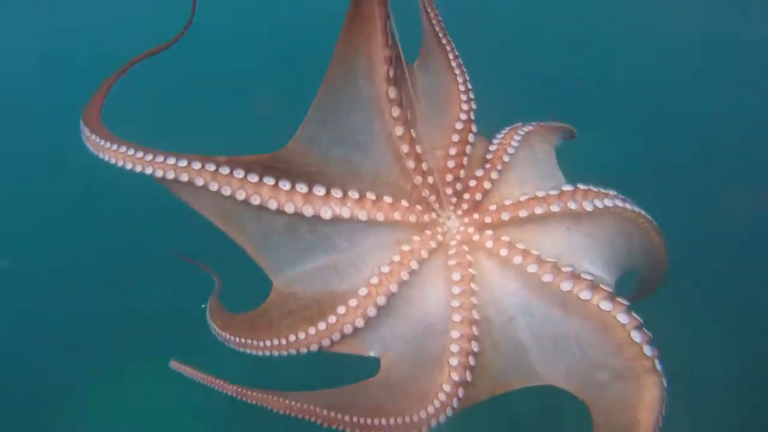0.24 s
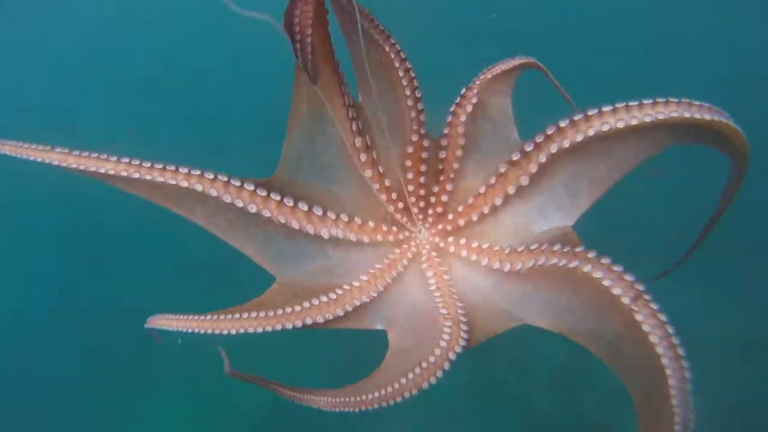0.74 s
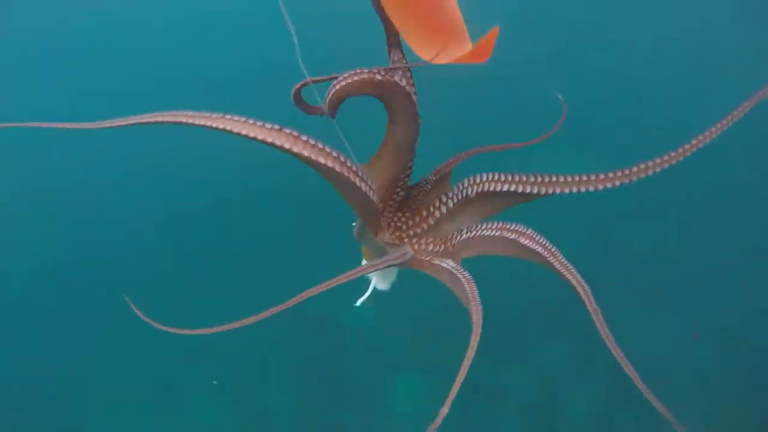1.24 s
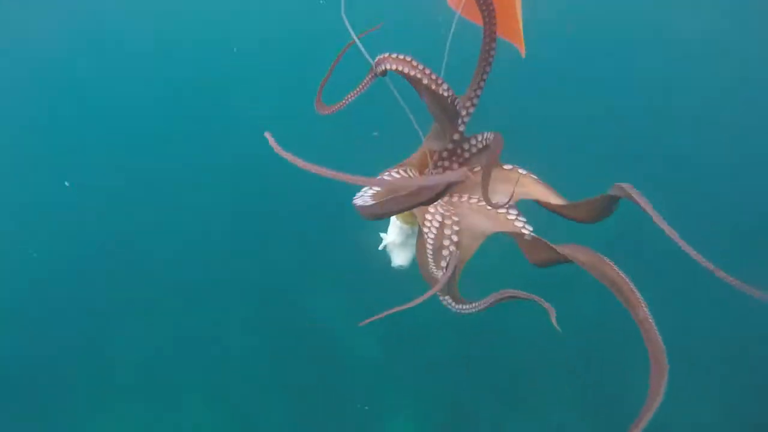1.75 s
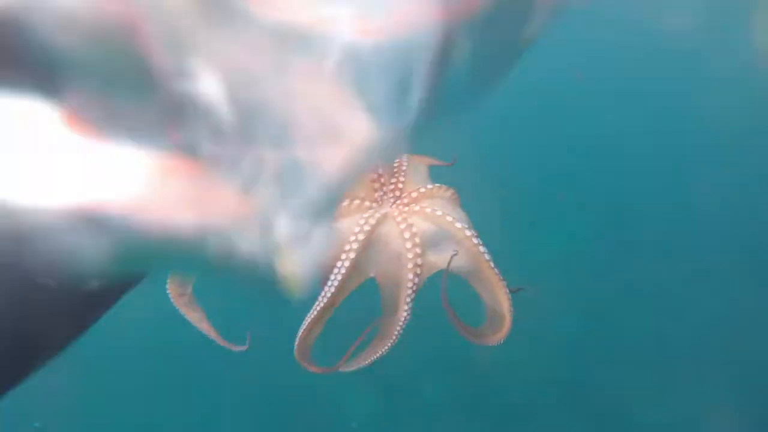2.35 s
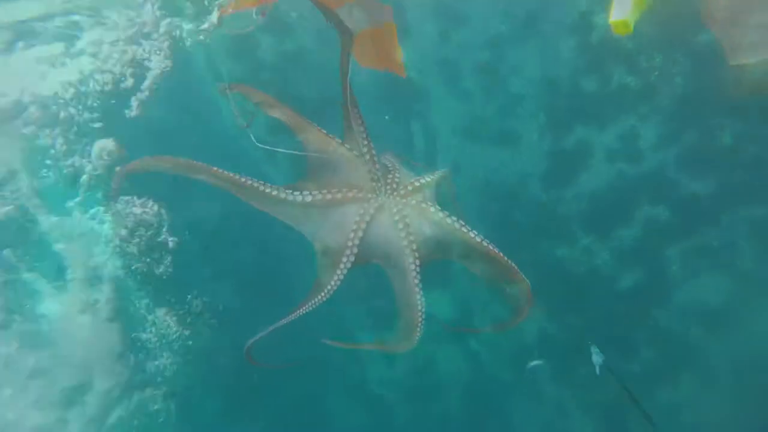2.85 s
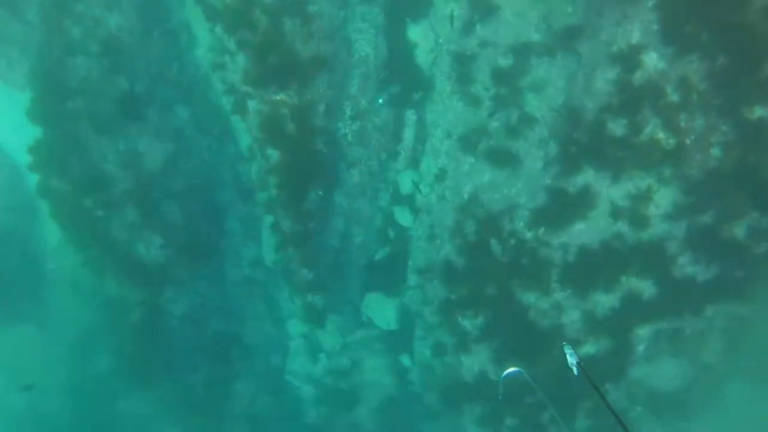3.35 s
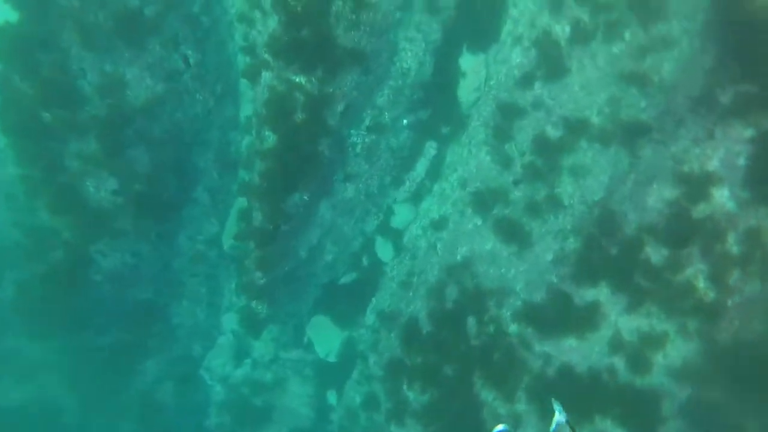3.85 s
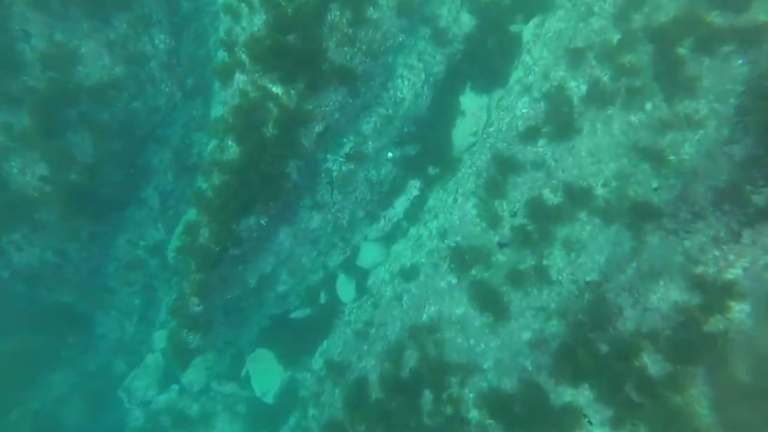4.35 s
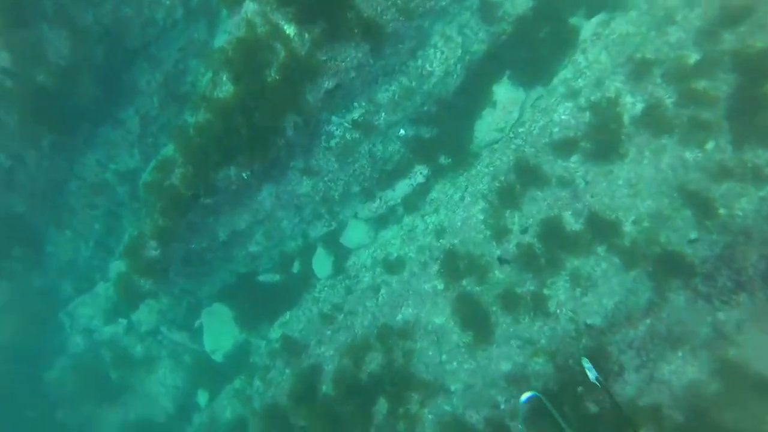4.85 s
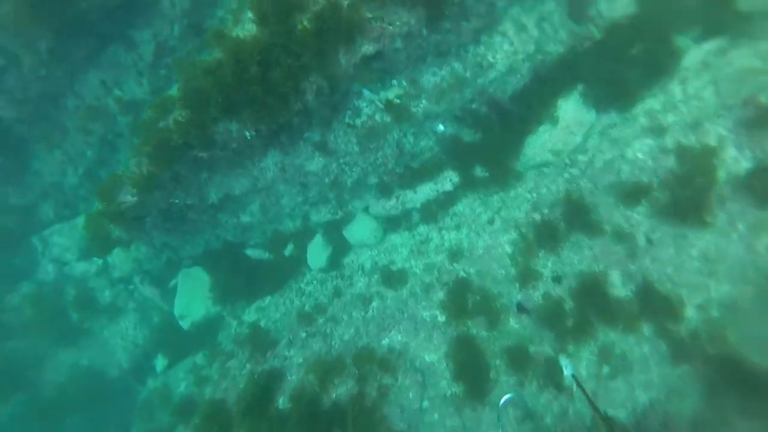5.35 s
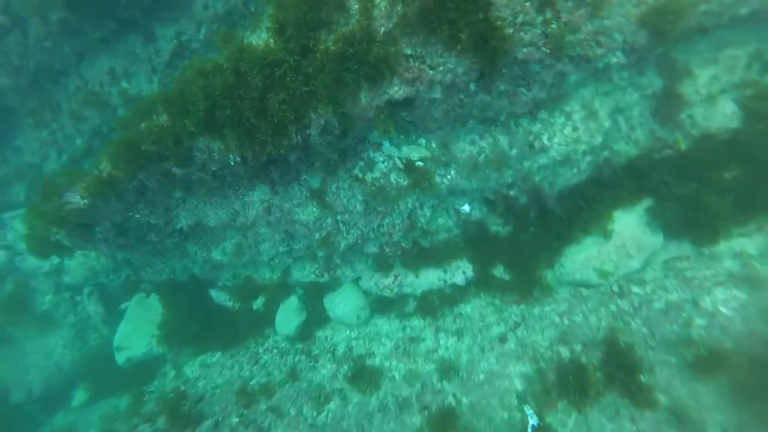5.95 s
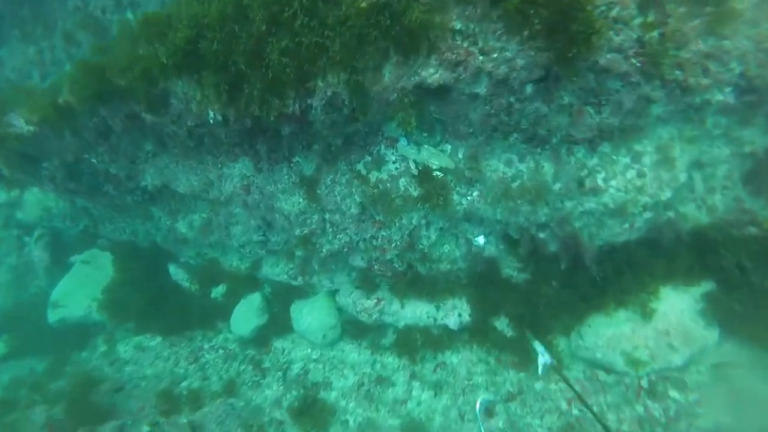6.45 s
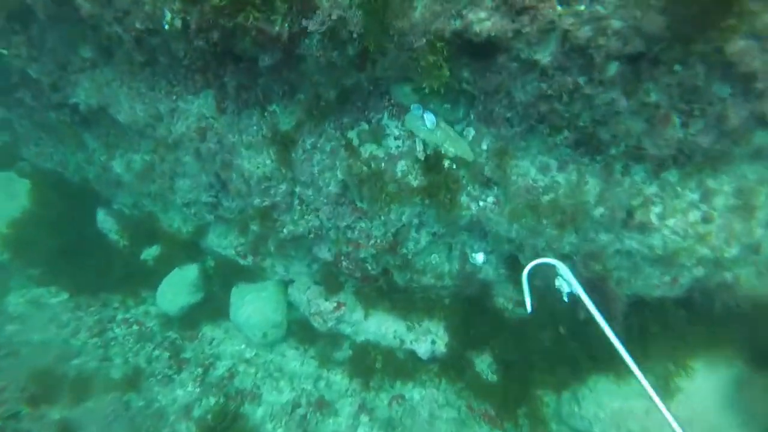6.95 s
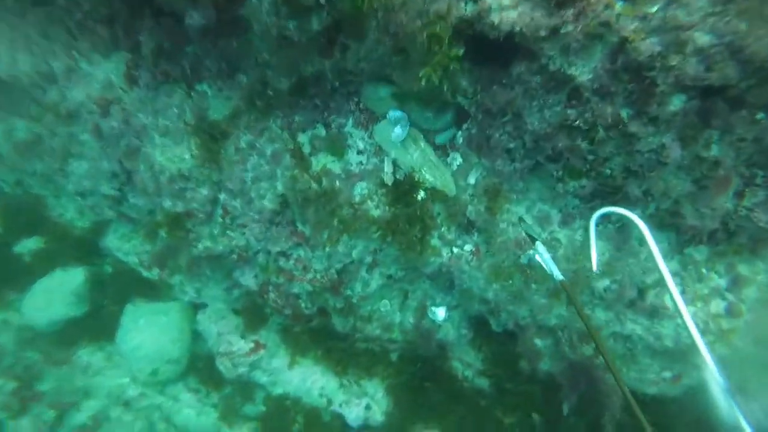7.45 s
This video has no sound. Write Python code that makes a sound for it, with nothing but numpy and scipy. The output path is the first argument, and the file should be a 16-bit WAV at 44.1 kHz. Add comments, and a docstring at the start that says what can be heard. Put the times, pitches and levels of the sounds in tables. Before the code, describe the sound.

Heard from inside a camera housing underwater, snapping shrimp crackle over a low, uneven rumble of moving water. A glove scrapes and bumps the shell in two early bouts, the second with sharp knocks, squeezing off a few small bubbles. After that the reef's sizzle and clicks get louder, with one faint squeak and a soft judder late on. The highest treble is dulled, with light hiss.

```python
"""A glove rubs and knocks a sealed camera housing on a sea dive, over the rumble of water flowing past.
Handling also flexes the shell, squeezes off bubbles and gives one squeak and one judder. Snapping shrimp
crackle on the reef, louder as the camera sinks towards the rocks. Snaps, rubs and knocks ring through
the modes of the shell; the microphone inside loses the top treble and adds hiss."""
import sys
import numpy as np
from scipy import signal
from scipy.fft import rfft, irfft
from scipy.io import wavfile
from scipy.ndimage import uniform_filter1d

SR = 44100
rng = np.random.default_rng(int(sys.argv[2]) if len(sys.argv) > 2 else 0)


def store_wav(level_fs):
    """Save 16-bit WAV to argv[1]."""
    pcm = np.round(np.clip(np.atleast_2d(level_fs), -1, 1) * 32767)
    wavfile.write(sys.argv[1], SR, pcm.T.astype(np.int16))


N = 339702

# flow noise spectrum: (frequency [Hz], relative density [dB])
RUMBLE_SPECTRUM = [(8.8, -62), (15, 3.5), (77, -0.5), (118, -6.5), (446, -30.5), (779, -33), (927, -27),
                   (1040, -33), (1500, -33), (1950, -44), (3300, -120)]
# microphone noise spectrum: (frequency [Hz], relative density [dB])
HISS_SPECTRUM = [(180, -3), (300, 3.5), (1870, -8), (2790, -9.5), (4170, -14), (5570, -31), (6650, 0),
                 (7440, -9), (10500, -18.5), (12200, -14.5), (13900, -35)]
# housing modes: (frequency [Hz], width [Hz], gain from the water [dB], gain under a glove [dB])
SHELL_MODES = [(415, 66, -36, 4.5), (590, 210, -31, 2.5), (702, 85, -41, 8.5), (1028, 203, -19.5, 2.5),
               (1540, 440, -21, -4.5), (2048, 222, -1.5, 4), (2300, 293, -8, 1.5), (2738, 386, -0.5, -3.5),
               (3600, 460, -25, -12), (4060, 450, -12, -11), (4923, 407, 2, -9.5), (5480, 730, -5, -13),
               (6458, 227, 8, -9), (7180, 770, -11, -45), (7850, 1300, -4.5, -22.5),
               (9900, 510, -12.5, -51), (12850, 400, -8.5, -37)]
# flow rumble: (time [s], level [dB])
FLOW_LEVEL = [(0.0, -36), (0.3, -44), (0.56, -44.5), (0.92, -46), (1.69, -56), (1.9, -53), (2.17, -41.5),
              (2.44, -55.5), (3.3, -45), (3.69, -47.5), (4.18, -44), (4.7, -51), (5.21, -46), (6.3, -46.5),
              (6.8, -42.5), (7.06, -51), (7.7, -46)]
# far shrimp: (time [s], base level [dB])
SIZZLE_LEVEL = [(0.0, -67), (2.44, -65.5), (2.7, -59.5), (3.7, -53), (6.2, -54), (6.9, -52.5), (7.7, -56)]
# near shrimp: (time [s], peak above 3.9 kHz [dB], relative peak of the band below [dB])
SNAPS = [(0.052, -25, -4), (0.091, -38, 2), (0.2409, -48, -5), (0.398, -41, 1), (0.4673, -43.5, 0),
         (0.6297, -37.5, -6), (0.7935, -47, -17), (0.811, -30, -2.5), (1.116, -45, -13), (1.149, -39, -8),
         (1.223, -40.5, -5), (1.331, -39.5, -5.5), (1.3894, -33.5, -10), (1.436, -43, -22),
         (1.5707, -44, -25), (1.592, -38.5, -21), (1.8266, -43, -29), (1.868, -42.5, -8),
         (1.9773, -39.5, -10), (2.033, -35, -8), (2.531, -42, -4), (2.562, -35.5, -10), (2.5879, -46, -4),
         (2.6026, -32.5, -4.5), (2.647, -34.5, -2), (2.8044, -37, -6), (2.999, -49.5, 10.5),
         (3.121, -51, 9), (3.182, -49, 7), (3.264, -43, -4), (3.302, -32.5, -13), (3.4956, -44.5, 10),
         (3.509, -33.5, -9), (3.528, -36, 0), (3.583, -33.5, -8), (3.597, -35, -0.5), (3.6696, -31.5, -12),
         (3.914, -36, -0.5), (4.126, -28, -17), (4.166, -33.5, -5), (4.2152, -37, -23), (4.281, -38, -3.5),
         (4.307, -40, -5), (4.34, -29.5, -24), (4.5054, -26, -7.5), (4.5754, -32, 2.5), (4.6242, -32.5, -5),
         (4.777, -45.5, 10), (4.8359, -31, -3.5), (4.9002, -27.5, -16), (4.938, -36, -12), (4.958, -39, -8),
         (5.0566, -42.5, 3), (5.1356, -41, 3), (5.1746, -35.5, -17), (5.224, -36, -11),
         (5.3553, -30, -10.5), (5.478, -38, 8), (5.5574, -39, 10.5), (5.813, -36.5, 4.5), (5.8353, -41, 0),
         (5.842, -34.5, -17), (5.8782, -21, -18), (5.892, -48, 13.5), (5.9512, -27.5, -4.5),
         (5.9612, -31.5, -5), (6.1507, -34.5, -6), (6.2145, -29, -11), (6.2371, -35, -16),
         (6.4414, -41.5, -3), (6.4761, -36, 0), (6.6167, -33.5, -4.5), (6.681, -40, 4), (6.69, -35.5, 0.5),
         (6.8156, -32, -17), (6.8763, -22.5, -22), (6.9624, -36, -9.5), (7.005, -46, -13),
         (7.016, -33.5, -8), (7.204, -29, -11), (7.343, -35.5, -10), (7.4513, -36.5, -10), (7.49, -35, -8),
         (7.567, -36, -1), (7.6777, -30.5, -7.5)]
# bubbles: (time [s], level [dB], pitch [Hz], t60 [s], half the relative pitch slope [1/s])
BUBBLES = [(.013, -28, 4780, 0.037, 0), (.025, -32, 4060, 0.15, 0.6), (.055, -16, 6500, 0.012, 0),
           (.0905, -21, 4900, 0.017, -1), (.099, -20.5, 2244, 0.1, -8.5), (.123, -21, 3250, 0.023, -1),
           (.6388, -22, 2300, 0.026, -2.1), (.6995, -32.5, 2580, 0.015, -4), (2.094, -22, 2130, .03, -3),
           (2.118, -31, 6560, 0.012, -2), (2.634, -37.5, 1160, 0.027, 4), (2.683, -29, 720, 0.045, 0.5),
           (2.683, -25.5, 445, 0.064, -8.5), (2.7095, -23, 547, 0.034, 1.5), (2.836, -46, 3240, 0.045, 3),
           (6.15, -49, 2050, 0.023, -3)]
# housing flexes: (time [s], peak [dB], length [s], swings [cycles; negative pulls first])
SHOVES = [(.128, -25.5, 0.033, -1.5), (.172, -28, 0.0049, 2), (.178, -29, 0.058, 1.5),
          (.3285, -11, .03, -1.5), (.38, -17.5, 0.0031, 0.5), (.3985, -24, 0.0038, 0.8),
          (.616, -37, 0.02, -0.3), (.6378, -31.5, 0.0052, 2.1), (2.0735, -27.5, 0.015, 3.5),
          (2.1525, -17, .033, -1.5), (2.2, -31.5, 0.048, 1), (2.4865, -32.5, 0.0098, 2),
          (5.139, -31, 0.0087, -1.1), (5.577, -27.5, 0.02, 1.95), (7.41, -44, 0.015, 4)]
# glove strokes, one curve each: (time [s], middle-mode level [dB])
RUB_LEVELS = [
    [(0, -25.5), (.03, -32.5), (.075, -35), (.105, -33.5), (.14, -29.5), (.165, -34.5), (.188, -36),
     (.205, -55), (.26, -65)],
    [(.262, -56), (.292, -38.5), (.315, -41), (.335, -31.5), (.352, -41.5), (.37, -38), (.395, -56),
     (.43, -49), (.5, -51.5), (.555, -69)],
    [(.87, -74), (.95, -40.5), (1.0, -50.5), (1.025, -82)],
    [(2.0, -56.5), (2.06, -48.5), (2.095, -37.5), (2.13, -45), (2.15, -40.5), (2.175, -49), (2.215, -39.5),
     (2.232, -48), (2.245, -86)],
    [(2.57, -66), (2.605, -55.5), (2.73, -53), (2.75, -59), (2.86, -58)],
]
# stroke bands relative to the middle: (low start [dB], low end [dB], high start [dB], high end [dB])
RUB_COLOURS = [(-11.5, -11, -7, -13), (-1.5, 2.5, -3.5, -12), (5, 0, -8, -6.5), (-9, -1.5, -11, -3.5),
               (-6.5, -3, 6.5, -10)]
# blows: (time [s], ring peak [dB], centre [Hz], spread [octaves], contact [s], hollow-mode weight [dB])
KNOCKS = [(.0225, -26, 1000, 0.2, 0.0021, 1), (.1085, -17, 1300, 0.77, 0.0017, -35),
          (.7622, -40.5, 2300, 0.28, 0.0015, -31), (2.0712, -11.5, 2370, 0.81, 0.0022, -9.5),
          (2.4833, -31, 3550, 0.7, 0.001, -27), (2.4874, -10, 3090, 0.13, 0.00015, -37.5),
          (2.6822, -14.5, 2030, 0.24, 0.00077, -0.5), (2.7088, -22, 2180, 0.6, 0.003, -4)]


def gain_of(db):
    """Decibels to gain."""
    return 10 ** (np.asarray(db) / 20)


def unit_rms(x):
    """Scales to rms 1."""
    return x / np.sqrt(np.mean(x ** 2) + 1e-20)


def envelope(rows, t):
    """Gain of a level table at times t."""
    return gain_of(np.interp(t, *np.transpose(rows)))


def add(mix, start_s, sound):
    """Mixes a sound in at start_s."""
    part = mix[round(start_s * SR):][:len(sound)]
    part += sound[:len(part)]


def coloured_noise(spectrum):
    """Steady shaped noise, rms 1."""
    hz, db = np.transpose(spectrum)
    shape_db = np.interp(np.log(np.fft.rfftfreq(N, 1 / SR) + 1), np.log(hz), db)
    return unit_rms(irfft(rfft(rng.standard_normal(N)) * gain_of(shape_db), N))


def wander(shape, span_samples):
    """Smoothed noise, rms 1."""
    return unit_rms(uniform_filter1d(rng.standard_normal(shape), span_samples))


def grains(per_s, spread_db, n):
    """Random clicks of either sign, a few large."""
    size = gain_of(spread_db * np.minimum(rng.exponential(1, n), 4))
    return unit_rms(size * (rng.random(n) < per_s / SR) * rng.standard_normal(n))


def burst(decay_s, n):
    """Noise with a fast rise and exponential decay."""
    t = np.arange(n) / SR
    return rng.standard_normal(n) * np.exp(-t / decay_s) * (1 - np.exp(-t / 0.00074))


def mode(x, hz, width_hz):
    """One resonance, peak gain 1."""
    r = np.exp(-np.pi * width_hz / SR)
    poles = [1, -2 * r * np.cos(2 * np.pi * hz / SR), r * r]
    return signal.lfilter([(1 - r * r) / 2, 0, (r * r - 1) / 2], poles, x)


def shell_ring(drive, high, top_db=0, side_db=None):
    """Waterborne sound rings the shell modes above 3.9 kHz (high) or those below."""
    modes = [row for row in SHELL_MODES if (row[0] > 3900) == high]
    ring = 0
    for k, (hz, width_hz, water_db, _) in enumerate(modes):
        db = water_db + top_db * (hz > 7000) + (0 if side_db is None else side_db[k])
        ring += (-1) ** k * gain_of(db) * mode(mode(drive, hz, width_hz), hz, 6 * width_hz)
    return ring


def flow_rumble():
    """Turbulent flow: low noise in lumps."""
    lumps_db = 0.98 * unit_rms(uniform_filter1d(wander(N, 1500), 1500))
    rumble = unit_rms(coloured_noise(RUMBLE_SPECTRUM) * gain_of(lumps_db))
    return envelope(FLOW_LEVEL, np.arange(N) / SR) * rumble


def far_shrimp():
    """Distant snaps, each with a short tail off the rocks, merge into sizzle."""
    sizzle = np.zeros(N)
    for high, far_gain, band_db in ((False, 0.3, -4), (True, 0.22, 0.5)):
        far = np.zeros(N)
        for hz in np.geomspace(1800, 7000, num=8):
            clicks = grains(16, 1.56, N)
            snap = burst(0.0015, 500) + gain_of(-16) * burst(0.024, 500)
            far += signal.oaconvolve(clicks, mode(snap, hz, 0.32 * hz))[:N]
        drive = 0.33 * rng.standard_normal(N) + far_gain * unit_rms(far) + 0.21 * grains(1200, 6.6, N)
        sizzle += gain_of(band_db) * unit_rms(shell_ring(drive, high))
    return envelope(SIZZLE_LEVEL, np.arange(N) / SR) * sizzle


def near_shrimp(rise_s=0.00023, decay_s=0.0012, tail_s=0.01, tail_db=-17.5, direct_db=-29.5):
    """Single cracks with a tail off the rocks; each strikes the shell from its own side."""
    t = np.arange(1800) / SR
    crack_noise, tail_noise = rng.standard_normal((len(SNAPS), 2, len(t))).transpose(1, 0, 2)
    cracks = crack_noise * np.exp(-t / decay_s) * (1 - np.exp(-t / rise_s))
    drive = cracks + gain_of(tail_db) * tail_noise * np.exp(-t / tail_s)
    top_db = -0.2 * (np.array(SNAPS)[:, 2:] + 12)  # fuller snaps have less top
    side_db = 3.5 * rng.standard_normal((len(SNAPS), len(SHELL_MODES), 1)).transpose(1, 0, 2)
    out = np.zeros(N)
    for high, hz, width_hz in ((False, 2600, 1500), (True, 6500, 5000)):
        direct = gain_of(direct_db + top_db) * mode(drive, hz, width_hz)  # passes between the modes
        snaps = shell_ring(drive, high, top_db, side_db) + direct
        for (start_s, db, low_db), snap in zip(SNAPS, snaps):
            add(out, start_s, gain_of(db + (0 if high else low_db)) * snap / abs(snap).max())
    return out


def bubble(db, hz, t60_s, glide_per_s):
    """A bubble squeezed off the housing: a dying tone with drifting pitch."""
    t = np.arange(0, t60_s, 1 / SR)
    tone = np.sin(2 * np.pi * hz * t * (1 + glide_per_s * t))
    return gain_of(db - 60 * t / t60_s) * tone * (1 - np.exp(-t / 0.00026))


def squeak(length_s=0.053, start_hz=910, slip_s=0.035, end_hz=1160, attack_s=0.0059, fade_db_per_s=190):
    """Rubber stick-slip: three harmonics on a shaky pitch that jumps up late."""
    t = np.arange(0, length_s, 1 / SR)
    pitch_shake, level_shake = wander((2, len(t)), 90)
    hz = np.where(t < slip_s, start_hz, end_hz) * (1 + 0.06 * pitch_shake)
    cycles = np.cumsum(hz) / SR
    tone = sum(gain_of(db) * np.sin(2 * np.pi * k * cycles) for k, db in enumerate((0.1, -6, -16), 1))
    level_db = -43.5 - fade_db_per_s * (t - attack_s) + 3.2 * level_shake
    return np.minimum(t / attack_s, 1) * gain_of(level_db) * tone


def shove(peak_db, length_s, cycles):
    """The housing flexes: a push and a slowing rebound, no ring."""
    progress = np.linspace(0, 1, round(length_s * SR))
    bend = np.interp(peak_db, (-28, -24), (0.85, 0.6))  # gentle shoves start softer
    swing = np.sin(2 * np.pi * cycles * progress ** bend) * np.sin(np.pi * progress ** (bend - 0.05))
    return gain_of(peak_db) * swing / abs(swing).max()


def judder(start_s, gap_s=0.0195, peak_db=-30, length_s=0.02, cycles=1.2):
    """The housing judders: rows for four shoves, each weaker and shorter."""
    return [(start_s + k * gap_s, peak_db - 1.5 * k, length_s * 0.88 ** k, cycles) for k in range(4)]


def glove_rub(levels, low_start_db, low_end_db, high_start_db, high_end_db):
    """Rubber slips over the shell in dense uneven grains and rocks the whole housing."""
    t = np.arange(levels[0][0], levels[-1][0], 1 / SR)
    n = len(t)
    clumps_db = 2 * wander(n, 200)
    friction = (0.44 * rng.standard_normal(n) + 0.41 * grains(2500, 0.83, n)) * gain_of(clumps_db)
    swell_db = 1.44 * wander((len(SHELL_MODES), n), 900)
    rings = [(hz, (-1) ** k * gain_of(glove_db + swell_db[k]) * mode(friction, hz, width_hz))
             for k, (hz, width_hz, _, glove_db) in enumerate(SHELL_MODES)]
    low, middle, high = (unit_rms(sum(ring for hz, ring in rings if from_hz < hz < to_hz))
                         for from_hz, to_hz in ((0, 1300), (1300, 3700), (3700, SR)))
    rocking = unit_rms(mode(mode(friction, 42, 120), 70, 350))
    stroke = middle + gain_of(np.linspace(low_start_db, low_end_db, n)) * (low + 1.25 * rocking)
    stroke += gain_of(np.linspace(high_start_db, high_end_db, n)) * high
    return envelope(levels, t) * stroke * signal.windows.tukey(n, 0.02)


def knock(db, centre_hz, spread_oct, contact_s, hollow_db):
    """A chattering blow rings the modes near centre_hz and, below 800 Hz, the air space inside."""
    blow = 0.7 * burst(contact_s, 2500) + 2 * np.exp(-np.arange(2500) / 2.2)
    ring = 0
    for k, (hz, width_hz, *_) in enumerate(SHELL_MODES):
        nearness = np.exp(-0.5 * (np.log2(hz / centre_hz) / spread_oct) ** 2)
        weight = gain_of(hollow_db) if hz < 800 else nearness
        rounded = mode(mode(blow, hz, width_hz), hz, 4 * width_hz)  # wider pass softens the attack
        ring += (-1) ** k * weight / width_hz * rounded
    tick = mode(mode(blow, 1400, 3000), 1700, 6000)  # direct path to the microphone
    return gain_of(db) * (ring / abs(ring).max() + 0.3 * tick / abs(tick).max())


def scene():
    """Flow and reef, with the handling on top; mono."""
    mix = flow_rumble() + near_shrimp() + far_shrimp()
    add(mix, start_s=5.705, sound=squeak())
    for levels, colour in zip(RUB_LEVELS, RUB_COLOURS):
        add(mix, levels[0][0], glove_rub(levels, *colour))
    for rows, source in ((KNOCKS, knock), (SHOVES + judder(start_s=5.982), shove), (BUBBLES, bubble)):
        for start_s, *settings in rows:
            add(mix, start_s, source(*settings))
    return mix[None]


def record(dry, muffle_hz=9600, hiss_db=-61, band_limit_hz=14250):
    """Sealed microphone: treble loss, self-noise, band limit."""
    muffled = signal.sosfilt(signal.butter(8, muffle_hz, fs=SR, output="sos"), dry)
    noisy = muffled + gain_of(hiss_db) * coloured_noise(HISS_SPECTRUM)
    lowpass = signal.firwin(511, band_limit_hz, window=("kaiser", 9), fs=SR)
    return signal.oaconvolve(noisy, lowpass[None], "same")


dry = scene()
out = record(dry)
store_wav(out)
```